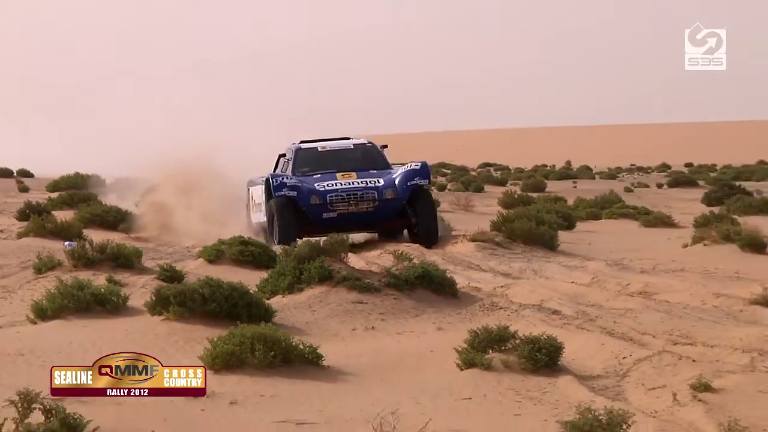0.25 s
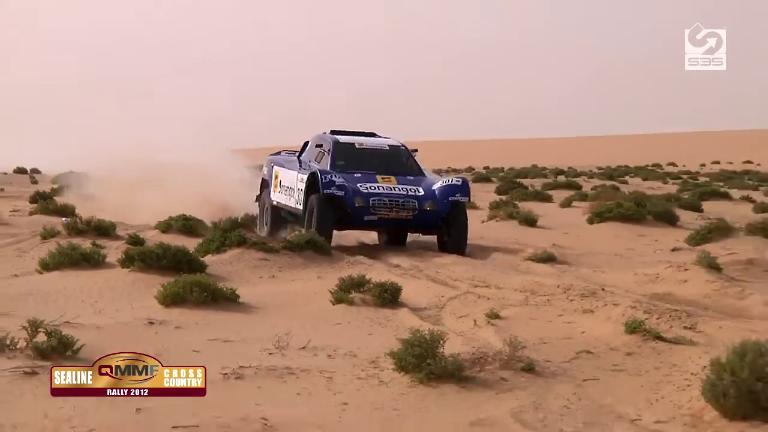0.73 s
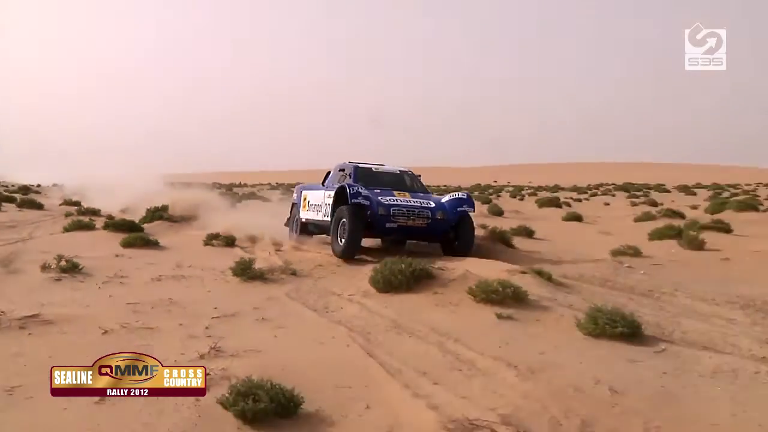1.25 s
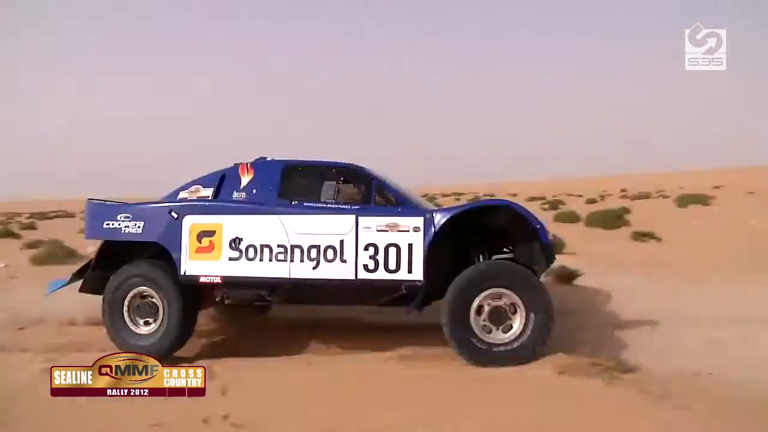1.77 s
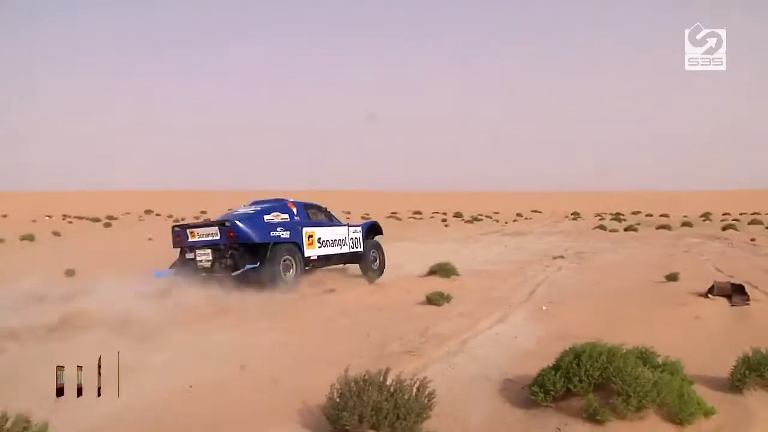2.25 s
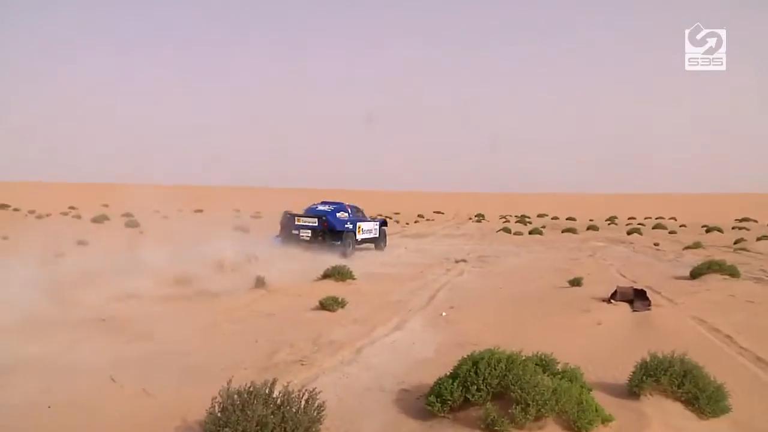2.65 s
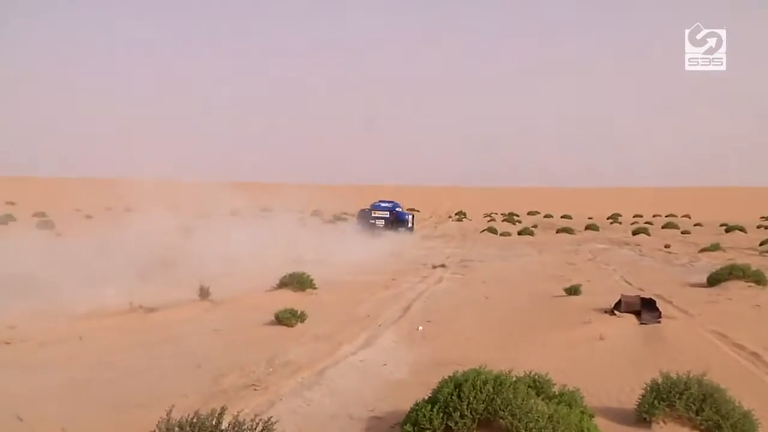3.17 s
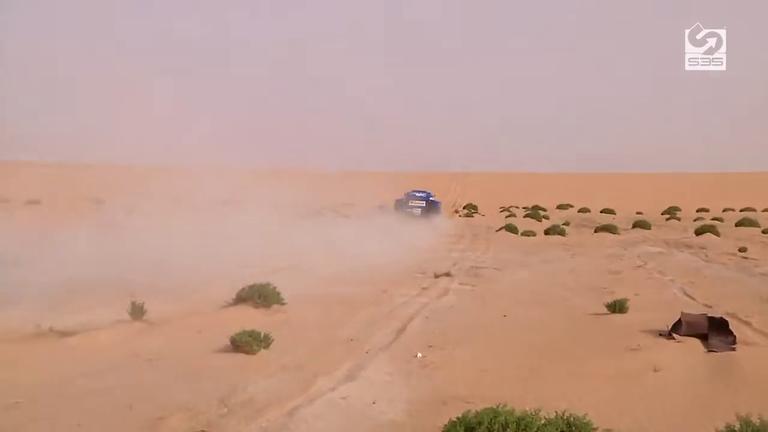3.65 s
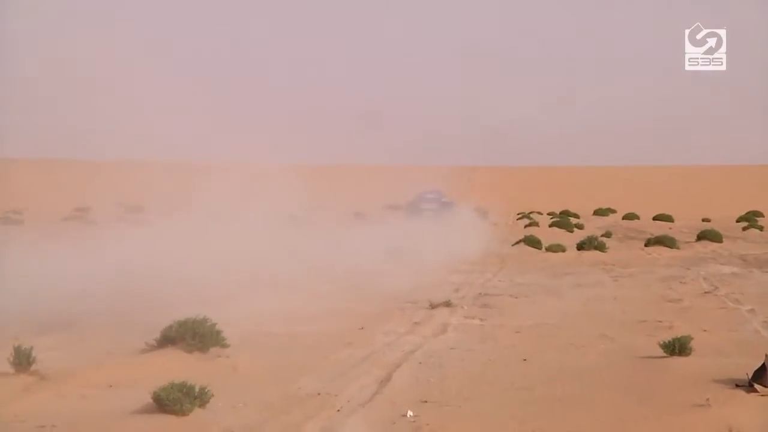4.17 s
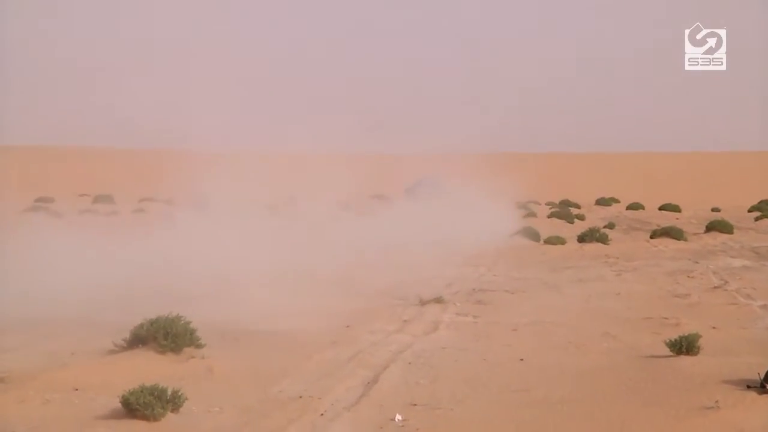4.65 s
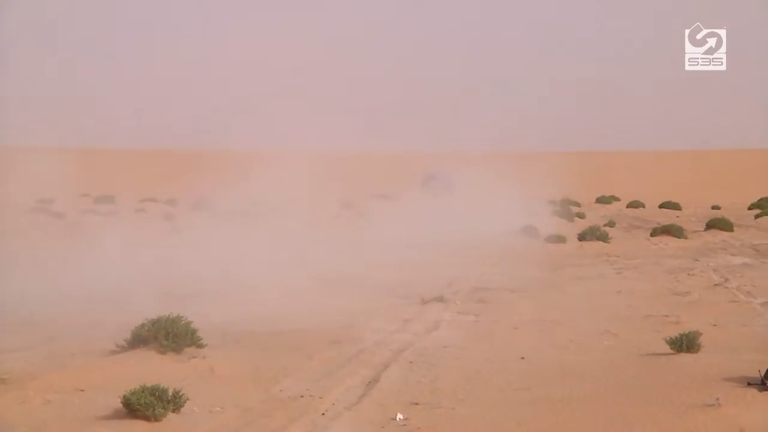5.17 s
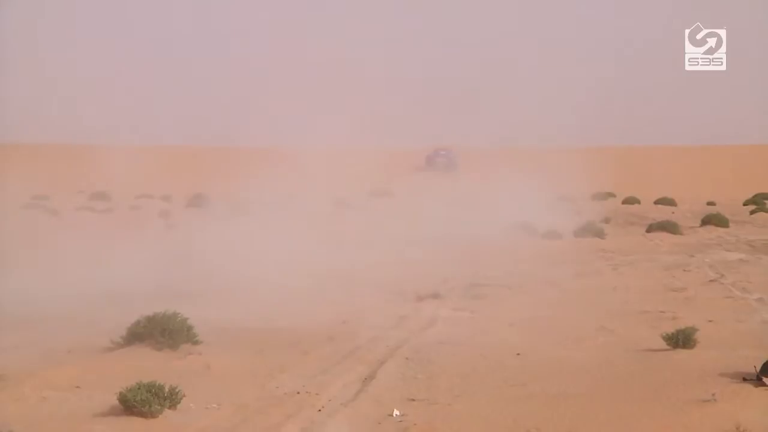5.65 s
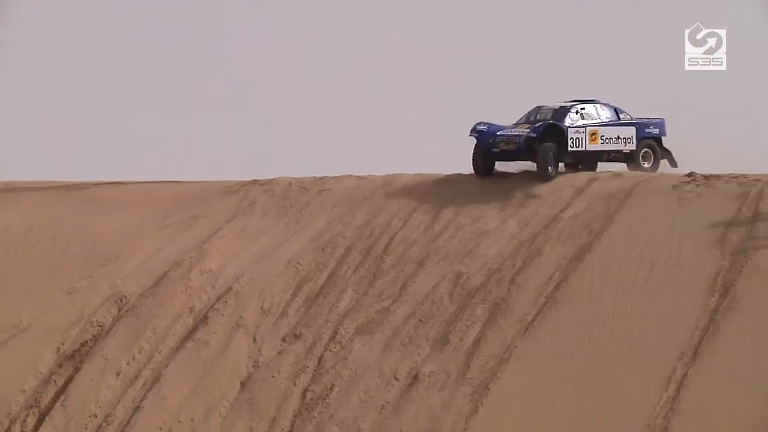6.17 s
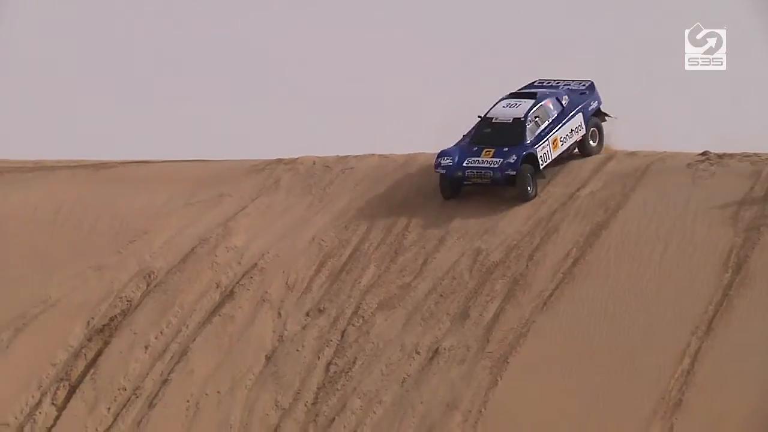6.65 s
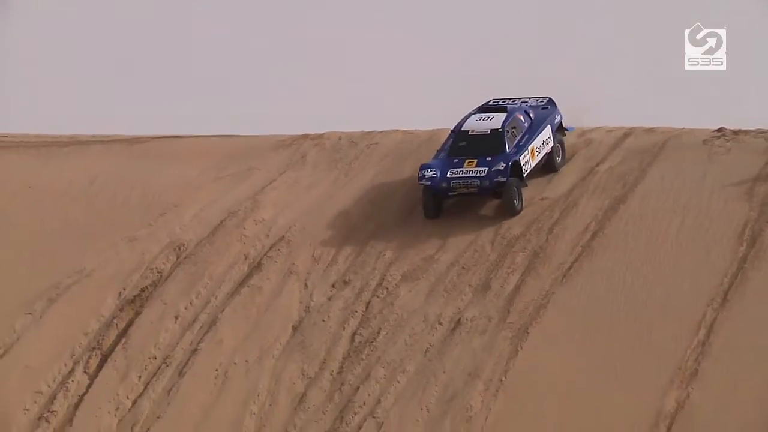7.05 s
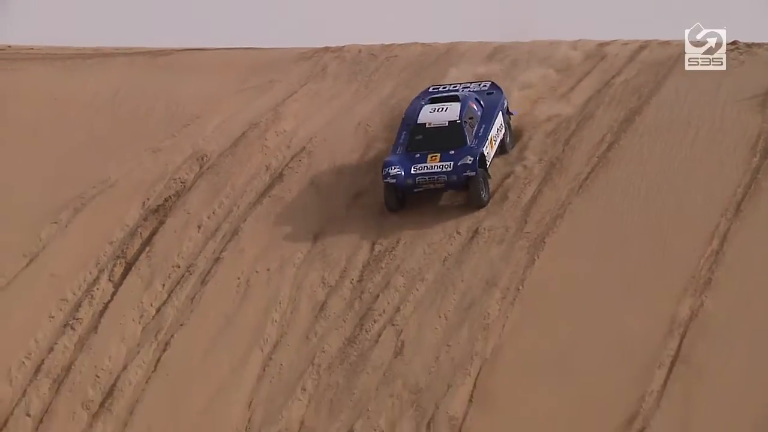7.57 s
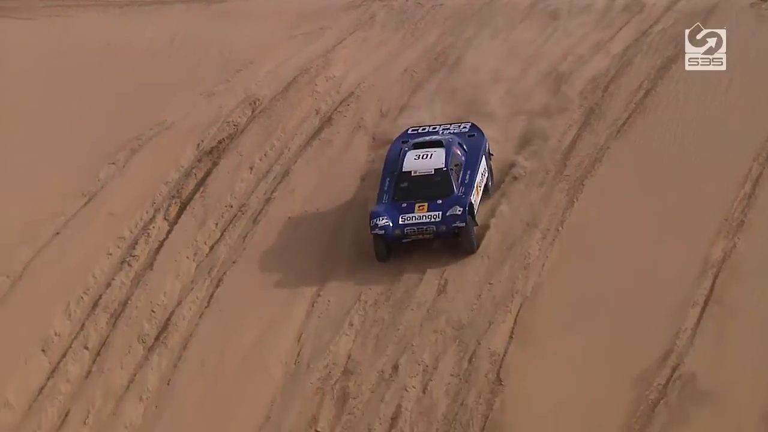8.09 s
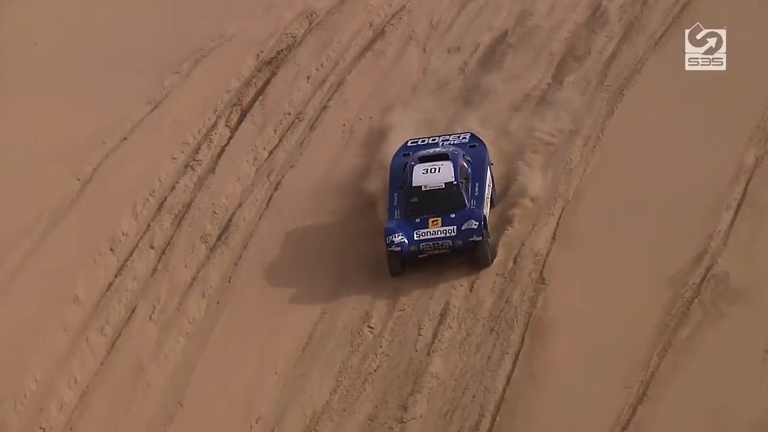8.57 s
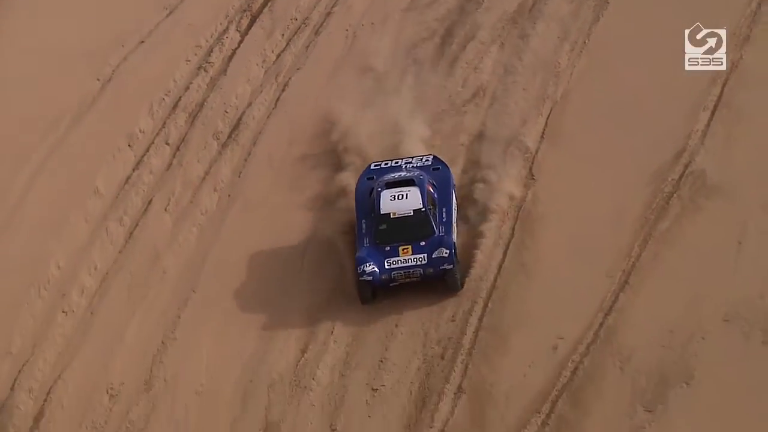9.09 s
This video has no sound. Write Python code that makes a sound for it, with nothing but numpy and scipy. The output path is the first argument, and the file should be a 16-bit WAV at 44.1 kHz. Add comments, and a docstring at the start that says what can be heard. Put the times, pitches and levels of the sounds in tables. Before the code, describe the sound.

An off-road racer's engine surges closer, passes with a rasping, popping exhaust and recedes, followed by a soft throttle blip and low throb.

```python
"""A V8 rally buggy charges across desert sand with a thin whine, revs flaring over bumps, gear roaring. Its
wheels thump down and throw sand; it passes close at about 2 s. It pulls away, the exhaust rasping and cracking
as each firing lets out a puff of gas. As that run fades, near 7 s, the scene changes: a buggy tips over a far
dune, blips the throttle and rolls down, throbbing at low revs, sand sliding under the tyres. Still air lies
under both runs."""
import sys
import numpy as np
from scipy import signal
from scipy.fft import rfft, irfft, next_fast_len
from scipy.io import wavfile

SR = 44100
rng = np.random.default_rng(int(sys.argv[2]) if len(sys.argv) > 2 else 0)


def digitize_waveform(pressure):
    """Quantize a signal to 16-bit integers and store it at the path in sys.argv[1].

    Rows of a 2-D input are taken as channels; values are limited to [-1, 1].
    """
    field = np.atleast_2d(pressure).T
    bounded = np.clip(field, -1, 1)
    quanta = np.round(bounded * 32767).astype(np.int16)
    wavfile.write(sys.argv[1], SR, quanta)


N = 411453
TIME_S = np.arange(N) / SR

# base engine speed (time [s], four-stroke cycle rate [Hz])
PASS_CYCLE_HZ = [(0, 24.6), (.22, 22.6), (.62, 22.9), (1.62, 23.8), (2.0, 25.4), (2.26, 22.4), (2.48, 24.7),
                 (2.97, 22.3), (3.03, 20.4), (3.3, 21.5), (3.63, 22.7), (4.15, 24.7), (4.5, 23.5),
                 (5.17, 24.6), (5.42, 22.4), (5.55, 22.5), (5.72, 24.4), (6.03, 25.8), (6.5, 25.4),
                 (6.8, 22.1), (7.3, 19.8)]
DUNE_CYCLE_HZ = [(6.5, 7.8), (7.0, 8.9), (7.24, 12.8), (7.4, 20), (7.55, 18.9), (7.78, 21.9), (7.95, 20.3),
                 (8.12, 15.4), (8.65, 15.7), (8.87, 14.5), (9.03, 15.5), (9.33, 15)]
# revs flare as wheels go light, sag as they dig in (peak time [s], extra rate [Hz], rise [s], fall [s])
SURGES = [(.93, 13.5, .22, .13), (1.28, 5.5, .13, .13), (1.79, 4.9, .16, .11), (1.903, 5.8, .04, .07),
          (2.74, 2.6, .07, .09), (3.27, 1.6, .13, .08), (3.79, 5.2, .15, .07), (4.67, 2.5, .13, .08),
          (4.885, 4.1, .12, .06), (4.97, -2.2, .04, .06), (5.33, 6, .16, .08), (6.29, 2, .15, .2)]
# driveline shudder on sand ripples (first crest [s], length [s], crest rate [Hz], depth [Hz])
SHUDDERS = [(.09, .36, 10.7, 1.0), (1.915, .36, 9.6, 1.5), (2.337, .48, 11.1, 1.1), (3.27, .34, 6.9, .7),
            (3.908, .45, 10.1, 1.45), (4.4, .17, 10, .8)]
# engine voices 0-4, even orders re order 8, odd re order 5
# (order, ahead [dB], side [dB], behind [dB], far on throttle [dB], far coasting [dB])
ORDER_DB = [(2, -19, -33, -32, -21, -26), (3, -6, -8, -10, -14, -8), (4, -19, -24, -36, -16, -12),
            (5, 0, 0, 0, 0, 0), (6, -15, -14, -16, -14, -7), (7, -11, -7, 4, -10, -5), (8, 0, 0, 0, 0, 0),
            (9, -12, -4, 3, -20, -1), (10, -16, -8, -8, -15, -6), (11, -5, 1, 4, -17, 6),
            (12, -15, -17, -17, -23, -9), (13, -11, -6, 0, -23, 3), (14, -22, -21, -18.5, -31, -18),
            (15, -21, -15, -4, -31, -7), (16, -10, -21, -20.5, -25, -13), (17, -20, -14, -3, -29, -8),
            (18, -15, -20, -22.5, -32, -20), (19, -13, -17, -5, -22, -14), (20, -21, -23, -28, -28, -30),
            (21, -19, -20, -10, -17, -19), (22, -25, -27, -35, -26, -30)]
# voice heard (time [s], voice [0-4], roughness [0-1])
PASS_VOICE = [(0, 1.5, .2), (.6, 1.1, .2), (.9, 0, .08), (1.9, 0, .06), (2.15, 1, .17), (2.9, 1, .11),
              (3.3, 2, .11), (5.3, 2, .06), (6.3, 2, .03), (7.2, 2, .07)]
DUNE_VOICE = [(7.95, 3, .06), (8.15, 4, .04), (9.33, 4, .06)]
# engine loudness (time [s], relative level [dB])
PASS_LEVEL_DB = [(0.0, -24), (0.28, -29.5), (0.68, -25), (0.75, -19.5), (0.97, -15.5), (1.07, -20.5),
                 (1.15, -16.5), (1.59, -9.5), (3.07, -12.5), (3.27, -8), (3.33, -10.5), (5.98, -11),
                 (6.64, -15), (6.76, -19), (6.84, -30), (7.11, -37.5), (7.23, -37), (7.25, -37.5),
                 (7.4, -80)]
DUNE_LEVEL_DB = [(6.3, -65), (6.5, -47), (7.25, -44), (7.32, -36.5), (8.002, -37), (8.158, -47),
                 (8.604, -43.5), (8.726, -50), (8.958, -46), (9.3, -57)]
# exhaust tone (time [s], low-pass corner [Hz], bank burble re firing drone [dB])
PASS_TONE = [(0, 504, -15.5), (.7, 496, -7), (1.35, 632, 4.5), (1.66, 597, -3.5), (1.85, 560, 8),
             (2.149, 430, 1), (2.9, 517, -14), (3.3, 675, -23.5), (5.299, 567, -26.5), (5.798, 361, -29),
             (6.3, 292, -27.5), (6.78, 206, -29.5), (7.2, 210, 14)]
DUNE_TONE = [(6.5, 600, -24), (7.25, 600, -18), (7.33, 600, -3), (7.85, 600, 0), (8.0, 600, -17),
             (9.33, 600, -25)]
# throttle lifts over bumps (start [s], end [s])
LIFTS_S = [(.83, 1.08), (1.87, 1.98)]
# gas burst at each of the eight firings (relative level [dB])
FIRING_DB = [5.5, -6.5, -8, 2, 2, -3.5, -0.5, -4]
# roar of gas and running gear (time [s], relative level [dB])
ROAR_DB = [(0.04, -49), (0.23, -52), (1.19, -39), (1.42, -34), (2.11, -25), (2.64, -27.5), (2.67, -24.5),
           (2.83, -31), (2.85, -28), (2.94, -46), (3.22, -40), (3.28, -31.5), (3.93, -28.5), (4.76, -30),
           (4.84, -24.5), (4.93, -29), (6.26, -34), (6.85, -56), (7.22, -63), (7.3, -51.5), (7.82, -50),
           (8.02, -66), (8.3, -58), (9.33, -66.5)]
# exhaust cracks (time [s], relative level [dB])
CRACKS = [(2.2877, -5), (2.3914, -5), (2.45, -5.5), (2.5546, -3), (2.6636, -5.5), (2.7197, -1),
          (2.7763, -8.5), (2.839, -5.5), (3.8872, -9.5), (3.925, -16), (4.3161, -15), (5.1697, -18),
          (5.7354, -13.5), (5.9386, -26.5)]
# tyre and body rumble (time [s], level re engine curves [dB])
RUMBLE_DB = [(0, -14), (1.2, -20), (1.7, -24), (2.1, -21), (2.6, -25), (3.0, -29), (3.3, -24), (4.4, -27),
             (5.8, -37), (6.3, -33), (6.7, -38), (7.4, -19), (8.3, -23), (9.3, -19)]
# wheels hitting sand (time [s], level [dB], centre [Hz], decay [s])
LANDINGS = [(1.531, -35.5, 4400, 0.016), (1.62, -47, 5000, 0.03), (1.853, -20, 45, 0.031),
            (1.863, -42, 6960, 0.0024), (2.111, -39.5, 5900, 0.022)]
# sand sliding down the dune (peak time [s], spread [s], level [dB])
SLIDES = [(8.3, 0.089, -68), (8.92, 0.13, -61)]
# approach whine (time [s], pitch [Hz], level [dB])
WHINE = [(.55, 4290, -120), (.7, 4290, -66), (1.2, 4280, -63), (1.6, 4250, -120)]
# noise spectra (frequency [Hz], relative density [dB])
EXHAUST_SPECTRUM = [(380, -38), (650, -4.5), (762, -5), (931, -1), (1380, -6), (1540, -3), (1800, -3.5),
                    (2150, -6), (2630, -12.5), (3290, -15), (4200, -26), (4800, -26.5), (6240, -52),
                    (10600, -120)]
FAR_EXHAUST_SPECTRUM = [(450, -18.5), (700, 4), (950, 2.5), (1300, -7.5), (1900, -13.5), (3000, -22.5),
                        (5000, -46), (9000, -62)]
DUNE_EXHAUST_SPECTRUM = [(260, -23.5), (450, -5.5), (533, -1), (689, -6), (738, -38.5), (791, -11.5),
                         (865, -27), (1050, -11.5), (1320, -19), (1700, -17), (1910, -23), (2170, -16),
                         (2470, -29), (2700, -22), (4800, -45), (6240, -78), (10600, -120)]
CRACK_SPECTRUM = [(500, -32.5), (1000, -13), (1800, 7), (3200, -4), (4500, -17.5), (7000, -43),
                  (14000, -60)]
GEAR_SPECTRUM = [(410, -36.5), (700, -19.5), (803, -6.5), (966, -0.5), (1080, -8.5), (1220, -4),
                 (1530, -9.5), (1670, -6), (1860, -7), (2220, -9.5), (2540, -11), (3650, -18.5),
                 (4800, -29), (6240, -63.5), (10600, -120)]
RUMBLE_SPECTRUM = [(30, -14), (60, 4), (120, -5), (250, 14), (340, 10), (450, 17), (600, 10), (780, -5.5),
                   (1200, -20.5), (2500, -45)]
SPRAY_SPECTRUM = [(3000, -25.5), (5500, -4.5), (6800, -2), (9000, -13), (10500, -20.5), (14000, -27.5)]
SLIDE_SPECTRUM = [(250, -8), (600, 0), (900, 2), (1300, -9), (2000, 3), (3000, -14), (6000, -40)]
AIR_SPECTRUM = [(15, -47.5), (25, -24), (102, -1.5), (127, -2), (173, -2), (236, -7), (328, -27),
                (418, -18.5), (477, -32), (693, -19.5), (922, -26), (1050, -39.5), (2170, -38.5),
                (4800, -53), (6240, -68), (10600, -120)]
HISS_SPECTRUM = [(2000, -11), (5000, 2.5), (14000, -3.5)]
# stereo width (frequency [Hz], side re mid [dB])
WIDTH_DB = [(100, -39), (1000, -23), (2500, -23.5), (4000, -18), (5700, -6.5), (7500, -6.5), (13000, -1.5)]
# microphone balance (frequency [Hz], left re right [dB])
BALANCE_DB = [(250, -1.5), (700, -.4), (2500, .3), (6000, -2.5), (9000, -3), (13000, -.5)]

FIRINGS_PER_CYCLE = len(FIRING_DB)


def engine(cycles, level_db, voices, tone, lift=0, pipe_hz=200, pipe_width_hz=80, dispersion_rad=.1825):
    """Even orders ring in the tailpipe; odd orders come from the uneven firing of one cylinder bank."""
    on = (TIME_S >= level_db[0][0]) & (TIME_S <= level_db[-1][0])
    voice, roughness = np.array(curves(voices))[:, on]
    corner_hz, burble_db = curves(tone)
    # off throttle the note dulls and burbles
    corner_hz = (corner_hz * (1 - .53 * lift))[on]
    burble = from_db(burble_db + 8.5 * lift)[on]
    burble *= from_db(np.interp(voice, [1, 2, 3], [0, -4, 0]))   # from behind, the banks partly even out
    bank_firings = np.array([0, 3, 5, 6]) / FIRINGS_PER_CYCLE
    cycle_hz = np.gradient(cycles[on]) * SR
    out, power = np.zeros(N), 0
    for order, *voice_db in ORDER_DB:
        gain = from_db(np.interp(voice, np.arange(len(voice_db)), voice_db))
        gain /= np.sqrt(1 + (order * cycle_hz / corner_hz) ** 10)
        off_firing = order - FIRINGS_PER_CYCLE
        lag_rad = np.arctan((order * cycle_hz.mean() - pipe_hz) / pipe_width_hz)
        lag_rad += dispersion_rad * off_firing ** 2   # pipe reflections spread each pulse
        if order % 2:
            gain *= burble
            lag_rad -= np.angle(np.exp(-2j * np.pi * order * bank_firings).sum())
        phase_rad = 2 * np.pi * order * cycles[on] - lag_rad
        # combustions vary, blurring orders far from the firing rate most
        blur = roughness * np.sqrt(4 + .06 * off_firing ** 2)
        wave = (1 + blur * drift(rate_hz=40)[on]) * np.cos(phase_rad)
        wave += blur * drift(rate_hz=40)[on] * np.sin(phase_rad)
        out[on] -= gain * wave * np.sqrt(2 / (1 + 2 * blur ** 2))
        power += gain ** 2
    out[on] /= np.sqrt(power)
    return out * from_db(curves(level_db)[0])


def crank(cycle_hz, wobble=.003):
    """Engine cycles turned so far; the speed is never quite steady."""
    return np.cumsum(cycle_hz * (1 + wobble * drift(rate_hz=35))) / SR


def rough_ground_cycle_hz():
    """Cruising speed plus the flares and shudders of rough ground."""
    cycle_hz, = curves(PASS_CYCLE_HZ)
    for peak_s, extra_hz, rise_s, fall_s in SURGES:
        cycle_hz += np.interp(TIME_S, [peak_s - rise_s, peak_s, peak_s + fall_s], [0, extra_hz, 0])
    for crest_s, length_s, rate_hz, depth_hz in SHUDDERS:
        ramp_s = .5 / rate_hz
        window = gate(crest_s - ramp_s, crest_s + length_s, ramp_s)
        cycle_hz += depth_hz * window * np.cos(2 * np.pi * rate_hz * (TIME_S - crest_s))
    return cycle_hz


def gas_bursts(cycles, scatter_db=1.5, decay_intervals=.5, rise_intervals=.02):
    """Each firing lets out a sharp puff that dies within the firing interval; unit power."""
    firing, age = np.divmod(cycles * FIRINGS_PER_CYCLE, 1)
    firing = firing.astype(int)
    scatter = np.clip(rng.standard_normal(4096), -2, 2)
    size = from_db(np.array(FIRING_DB)[firing % FIRINGS_PER_CYCLE] + scatter_db * scatter[firing])
    return unit_rms(size * np.exp(-age / decay_intervals) * (1 - np.exp(-age / rise_intervals)))


def rasp(bursts, roar_db, behind, idle_share=.22, ahead_share=.5, behind_share=.87, onset_db=(-47, -37)):
    """Pulsing gain: loud roar comes in exhaust bursts, most of all from behind."""
    effort = np.interp(roar_db, onset_db, [0, 1])
    loud_share = ahead_share * (1 - behind) + behind_share * behind
    share = idle_share * (1 - effort) + loud_share * effort
    return np.sqrt(1 - share + share * bursts ** 2)


def pipe_ring(cycles):
    """The same short, ragged ringing, set off anew at every firing."""
    firing = np.floor(cycles * FIRINGS_PER_CYCLE)
    age_samples = np.arange(N) - np.searchsorted(firing, firing)
    return rng.standard_normal(2048)[age_samples % 2048]


def exhaust_roar(roar, ring, behind, dune):
    """Gas leaving the tailpipe: bright close by, duller with distance, hollow from the dune."""
    far = np.interp(TIME_S, [5.7, 6.2, 7.0], [0, .7, 1])
    out = stereo_noise(EXHAUST_SPECTRUM, from_db(-.44) * roar * np.sqrt(behind * (1 - far)), ring)
    out += stereo_noise(FAR_EXHAUST_SPECTRUM, roar * np.sqrt(far * (1 - dune)), ring)
    return out + stereo_noise(DUNE_EXHAUST_SPECTRUM, from_db(2.8) * roar * np.sqrt(dune), ring)


def exhaust_cracks(gain_db=-5.5, decay_s=.0015):
    """Sharp pops from the tailpipe."""
    envelope = sum(from_db(db + gain_db) * puff(start_s, decay_s) for start_s, db in CRACKS)
    return stereo_noise(CRACK_SPECTRUM, envelope)


def gear_roar(roar, ring, behind):
    """Running gear, heard until the tailpipe takes over."""
    return stereo_noise(GEAR_SPECTRUM, from_db(-.1) * roar * np.sqrt(1 - behind), ring)


def tyre_rumble(pulsing, gain_db=6.5):
    """Tyres and body rumble, following the engine's loudness."""
    engine_db = np.maximum(curves(PASS_LEVEL_DB)[0], curves(DUNE_LEVEL_DB)[0])
    level_db = engine_db + curves(RUMBLE_DB)[0] + gain_db
    return stereo_noise(RUMBLE_SPECTRUM, from_db(level_db) * np.sqrt(pulsing))


def sand_spray(roar, closest_s=1.95, peak_re_roar_db=-25, fade_db_per_s=5, flicker_db=1.8):
    """Thrown sand hisses, loudest as the buggy goes by."""
    level_db = peak_re_roar_db - fade_db_per_s * np.abs(TIME_S - closest_s)
    return stereo_noise(SPRAY_SPECTRUM, roar * from_db(level_db + flicker_db * drift(rate_hz=290)))


def landings():
    """Tyres thump down and throw sand."""
    out = np.zeros((2, N))
    for start_s, db, hz, decay_s in LANDINGS:
        spectrum = [(hz / 10, -40), (hz / 2, -4), (hz, 0), (hz * 2, -14), (hz * 10, -60)]
        out += from_db(db) * puff(start_s, decay_s) * stereo_noise(spectrum)
    return out


def sand_slides():
    """Soft swells of sand sliding under the tyres."""
    swells = sum(from_db(db) * np.exp(-.5 * ((TIME_S - peak_s) / spread_s) ** 2)
                 for peak_s, spread_s, db in SLIDES)
    return stereo_noise(SLIDE_SPECTRUM, swells)


def whine(jitter=.0043):
    """A thin, wavering tone on the approach."""
    pitch_hz, level_db = curves(WHINE)
    pitch_hz *= 1 + jitter * drift(rate_hz=140)
    return from_db(level_db) * np.sin(2 * np.pi * np.cumsum(pitch_hz) / SR)


def desert_air(air_db=-43.5, hiss_db=-74.5):
    """Steady low rush and faint hiss."""
    return from_db(air_db) * stereo_noise(AIR_SPECTRUM) + from_db(hiss_db) * stereo_noise(HISS_SPECTRUM)


def stereo_noise(spectrum, envelope=1, ring=None, ring_share=.18):
    """Coloured noise, narrow in the bass, wide in the treble; a share may be pipe ringing."""
    source = rng.standard_normal((2, N))
    if ring is not None:
        source[0] = np.sqrt(1 - ring_share) * source[0] + np.sqrt(ring_share) * ring
    power = np.mean(bin_gains(spectrum, N) ** 2)
    mid, side = colour(source * envelope, spectrum) / np.sqrt(power)
    return mid + colour(side, WIDTH_DB) * np.array([[1], [-1]])


def colour(x, spectrum):
    """Filter by (frequency [Hz], gain [dB])."""
    size = next_fast_len(N + 4096, real=True)
    return irfft(rfft(x, size) * bin_gains(spectrum, size), size)[..., :N]


def bin_gains(spectrum, size):
    """Gain per FFT bin, interpolated in log frequency."""
    hz, db = np.transpose(spectrum)
    bins_hz = np.maximum(np.arange(size // 2 + 1) * SR / size, 1)
    return from_db(np.interp(np.log(bins_hz), np.log(hz), db))


def puff(start_s, decay_s):
    """Envelope: fast rise, exponential decay."""
    out, first = np.zeros(N), int(start_s * SR)
    age_s = TIME_S[:min(SR // 2, N - first)]
    out[first:first + len(age_s)] = np.exp(-age_s / decay_s) * (1 - np.exp(-10 * age_s / decay_s))
    return out


def gate(start_s, end_s, ramp_s):
    """1 between two times, 0 outside, with straight ramps."""
    return np.clip(np.minimum(TIME_S - start_s, end_s - TIME_S) / ramp_s + .5, 0, 1)


def drift(rate_hz):
    """Random wander of unit power."""
    knots = rng.standard_normal(8192)
    return unit_rms(np.interp(TIME_S * rate_hz, np.arange(len(knots)), knots))


def curves(rows):
    """A time table's columns at every sample."""
    time_s, *columns = np.transpose(rows)
    return [np.interp(TIME_S, time_s, column) for column in columns]


def from_db(db):
    """Decibels to gain."""
    return 10 ** (np.asarray(db) / 20)


def unit_rms(x):
    """Scale to unit power."""
    return x / np.sqrt(np.mean(x ** 2) + 1e-20)


def scene():
    """The close pass, then the dune run, over still air."""
    pass_cycles = crank(rough_ground_cycle_hz())
    dune_cycles = crank(curves(DUNE_CYCLE_HZ)[0])
    lift = sum(gate(start_s, end_s, ramp_s=.038) for start_s, end_s in LIFTS_S)
    note = engine(pass_cycles, PASS_LEVEL_DB, PASS_VOICE, PASS_TONE, lift)
    note += from_db(4) * engine(dune_cycles, DUNE_LEVEL_DB, DUNE_VOICE, DUNE_TONE,
                                pipe_hz=130, dispersion_rad=.02)
    # crossfades: gone by, then on the dune
    behind = np.interp(TIME_S, [1.95, 2.4], [0, 1])
    dune = np.interp(TIME_S, [7.15, 7.35], [0, 1])
    bursts = np.where(dune < .5, gas_bursts(pass_cycles), gas_bursts(dune_cycles))
    ring = pipe_ring(np.where(dune < .5, pass_cycles, pass_cycles[-1] + dune_cycles))
    roar_db, = curves(ROAR_DB)
    pulsing = rasp(bursts, roar_db, behind)
    roar = from_db(roar_db) * pulsing
    exhaust = exhaust_roar(roar, ring, behind, dune) + exhaust_cracks()
    chassis = gear_roar(roar, ring, behind) + tyre_rumble(pulsing)
    sand = sand_spray(roar) + landings() + sand_slides()
    return note + exhaust + chassis + sand + whine() + desert_air()


def record(dry):
    """The two microphone ports differ a little in colour; the top is cut."""
    left = colour(dry[0], [(hz, db / 2) for hz, db in BALANCE_DB])
    right = colour(dry[1], [(hz, -db / 2) for hz, db in BALANCE_DB])
    stopband_hz = 15015
    lowpass = signal.cheby2(14, 60, stopband_hz, fs=SR, output="sos")
    return signal.sosfilt(lowpass, np.array([left, right]))


dry = scene()
out = record(dry)
digitize_waveform(out)
```